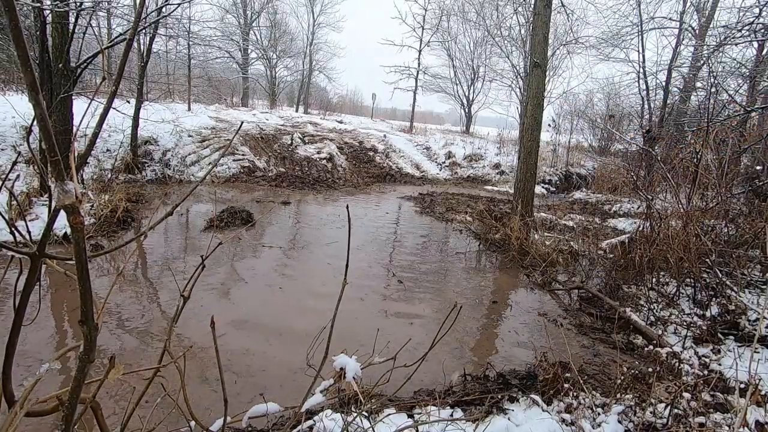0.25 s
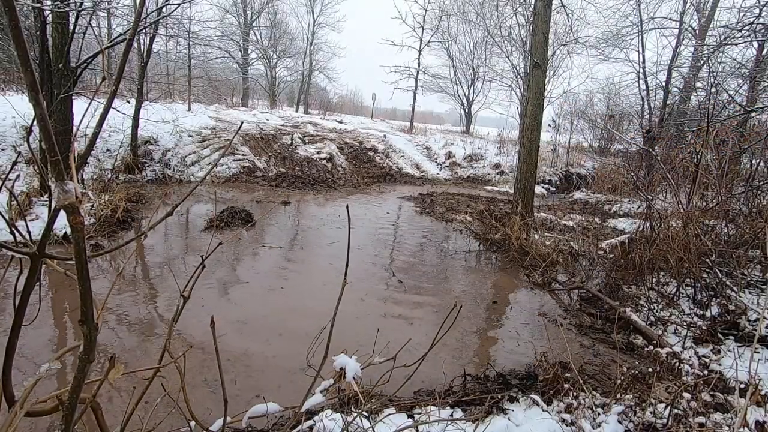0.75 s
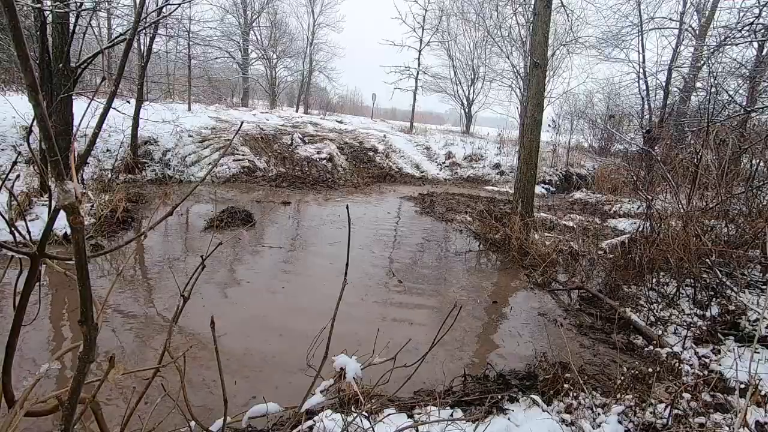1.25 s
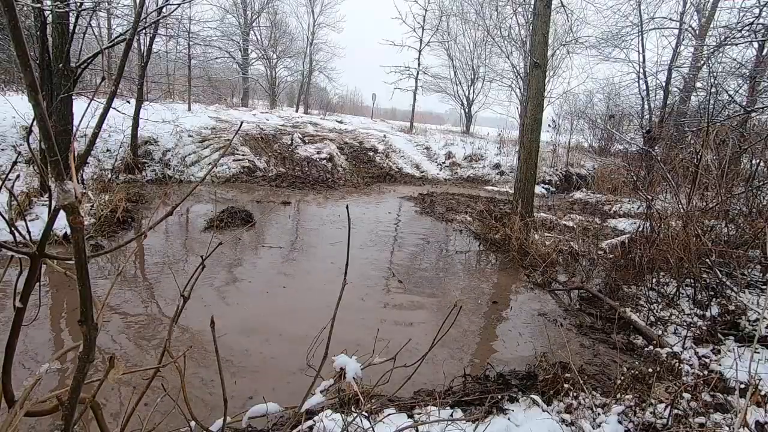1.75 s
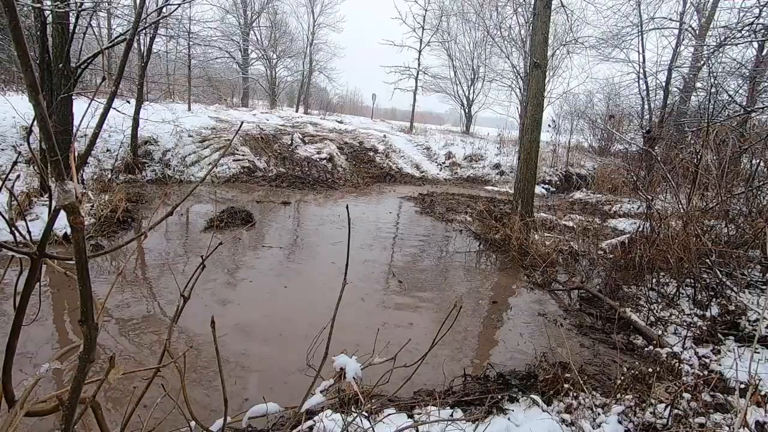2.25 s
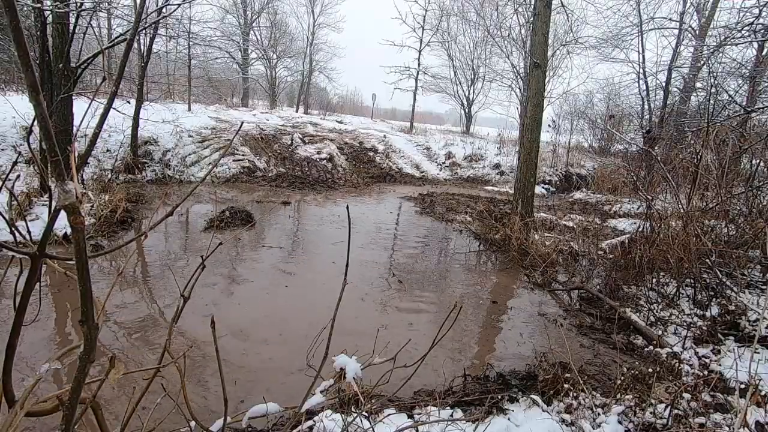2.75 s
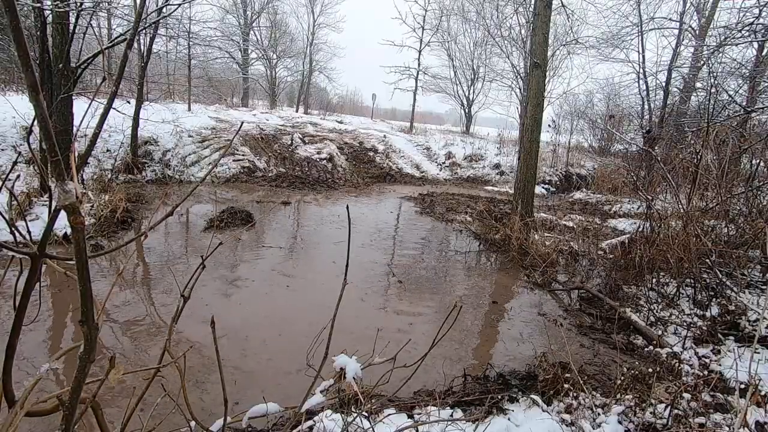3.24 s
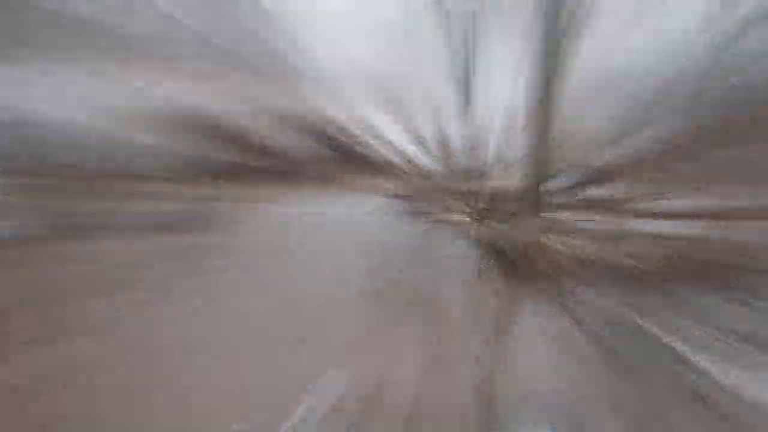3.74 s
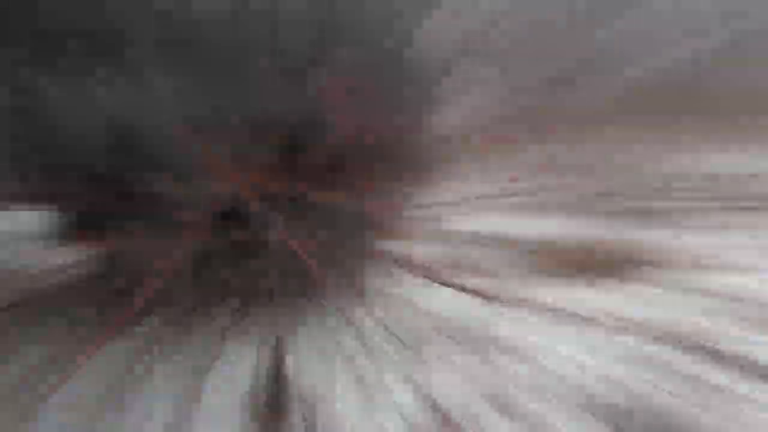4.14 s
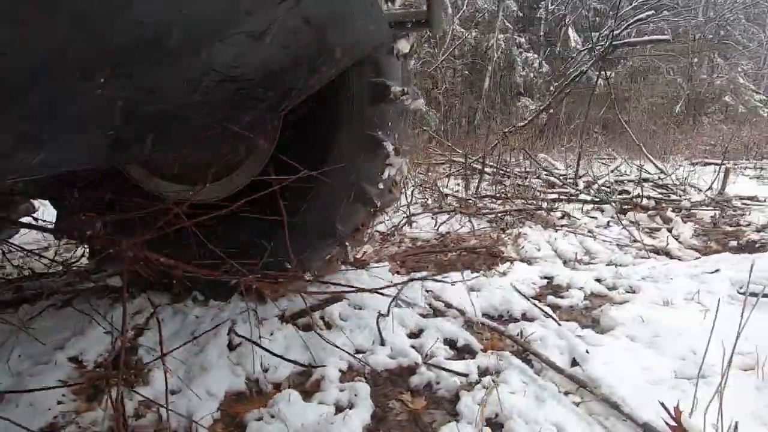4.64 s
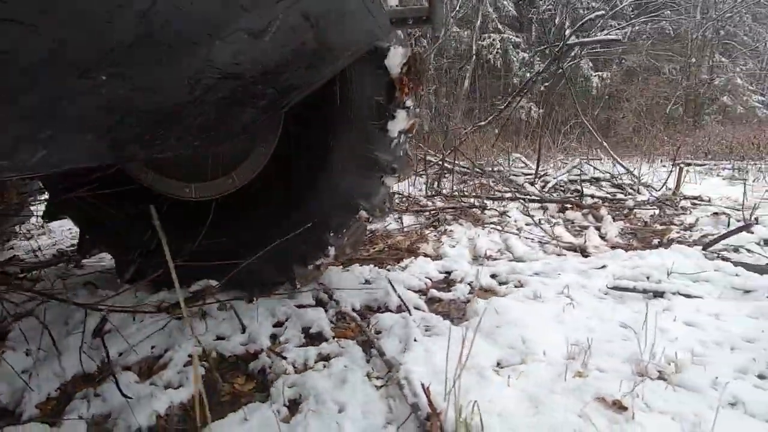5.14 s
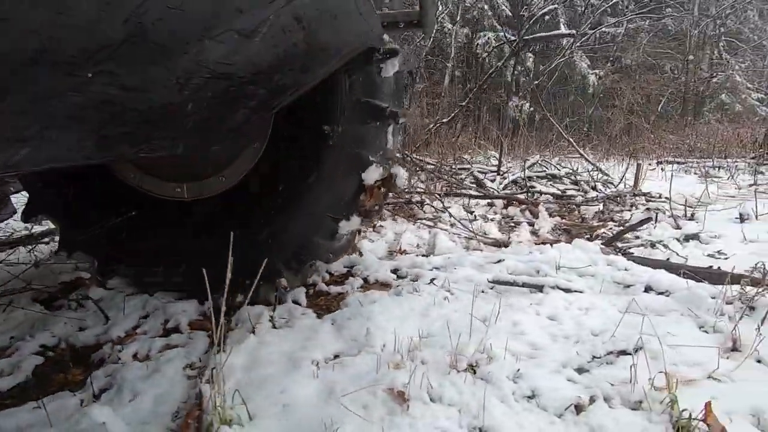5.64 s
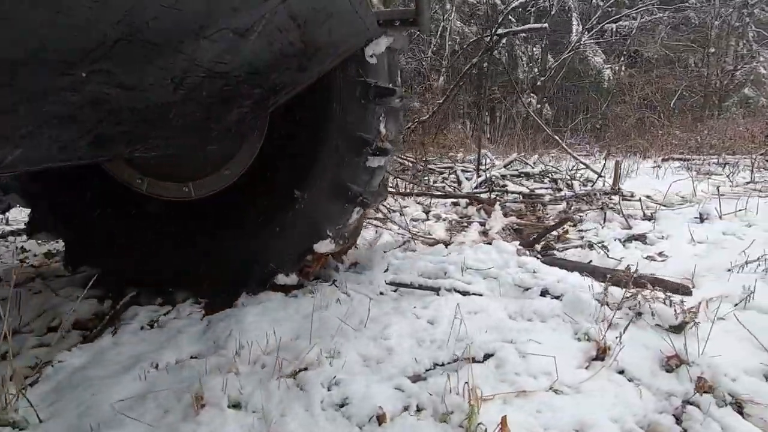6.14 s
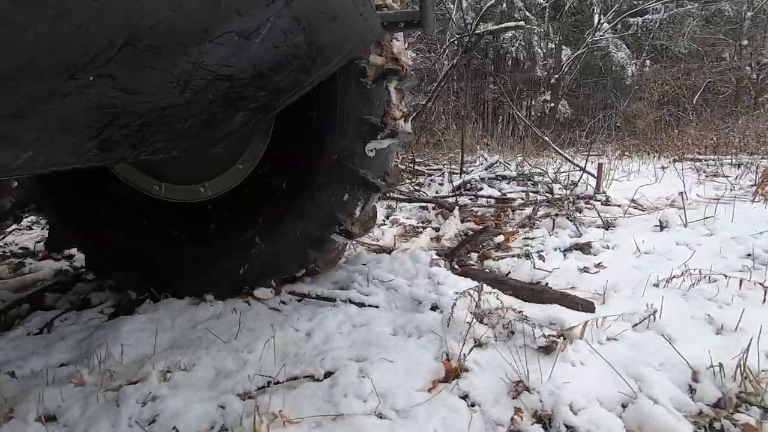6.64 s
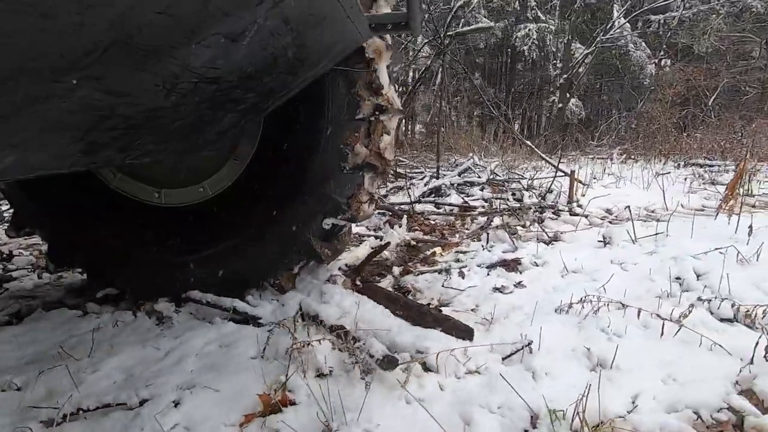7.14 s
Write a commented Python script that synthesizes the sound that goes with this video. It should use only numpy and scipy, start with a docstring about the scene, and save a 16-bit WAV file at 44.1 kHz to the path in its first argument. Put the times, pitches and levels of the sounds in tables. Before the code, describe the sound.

Distant diesel engine hum blends into a close, deep throbbing clatter while branches crackle violently, then sparse snaps and dull knocks over crawling tyres.

```python
"""A diesel all-terrain vehicle drones across a muddy pond in snowy woods while a few drips tick close by.
Its tones follow the firing rate, its rasp and clatter are gated noise; near 2.9 s its hull booms over a bump.
From 3.5 s to 4.565 s this crossfades to a spot beside its wheel: steady harmonics throb, the block clatters.
Around 4 s brushwood scrapes, snaps, squeals and knocks, as noise bursts and slips that ring resonances;
snow sifts off it as filtered grains, then scattered snaps follow and dull knocks return, strongest near 7.2 s."""
import sys
import numpy as np
from scipy import signal
from scipy.fft import rfft, irfft, next_fast_len
from scipy.io import wavfile

SR = 44100
rng = np.random.default_rng(int(sys.argv[2]) if len(sys.argv) > 2 else 0)


def pcm_store(signal):
    """Save signal as 16-bit PCM."""
    levels = np.round(np.clip(np.atleast_2d(signal), -1, 1) * 32767)
    wavfile.write(sys.argv[1], SR, levels.astype(np.int16).T)


N = 325899
TIME = np.arange(N) / SR
SIDES = np.array([[1], [-1]])  # left, right
# crossfade from the far to the near engine
DISSOLVE_START_S, DISSOLVE_END_S = 3.5, 4.565
CRAWL_HZ = 56.5  # firing rate at crawling speed
USUAL_SNAP_S, TWIG_HZ = 0.022, 3580  # reference length and pitch of a snap


def from_db(db):
    """Level to amplitude: 20 dB is a factor of ten."""
    return 10 ** (np.asarray(db) / 20)


def rms_one(x):
    """Normalise the effective value (root mean square) to 1."""
    return x / np.sqrt(np.mean(x ** 2) + 1e-20)


def peak_one(x):
    """Normalise the peak amplitude to 1."""
    return x / np.max(np.abs(x))


def in_time(rows):
    """Linear interpolation in time: one curve per column after the first."""
    s, *columns = np.transpose(rows)
    return [np.interp(TIME, s, c) for c in columns]


def at_hz(points, hz):
    """Linear interpolation of a spectrum over log frequency."""
    f, value = np.transpose(points)
    return np.interp(np.log(hz + 1), np.log(f), value)


def ramp(start, end):
    """Linear transition: from 0 at one time to 1 at another."""
    return np.clip((TIME - start) / (end - start), 1e-9, 1)


def panned(pan_db):
    """Stereo level difference: left and right gains, half of it on each side."""
    return from_db(0.5 * SIDES * pan_db)


def add(out, s, sound):
    """Superposition: mix a short sound in at time s."""
    start = max(0, round(s * SR))
    out[..., start:start + sound.shape[-1]] += sound[..., :N - start]


def drift(rate):
    """Random modulation: noise through two equal poles at rate/Hz, with spread 1."""
    step = 40  # samples between computed points
    r = np.exp(-2 * np.pi * step * rate / SR)
    noise = rng.standard_normal(N // step + 2002)
    slow = signal.lfilter([1], [1, -2 * r, r * r], noise)[2000:]  # drop the settling
    return np.interp(np.arange(N) / step, np.arange(len(slow)), rms_one(slow))


def lowpass(x, hz, order):
    """Low-pass filtering: attenuate what lies above a cutoff."""
    return signal.sosfilt(signal.butter(order, hz, fs=SR, output="sos"), x)


def resonance(x, hz, width):
    """Damped oscillator: a two-pole resonance with gain 1 on top."""
    r = np.exp(-np.pi * width / SR)
    zeros = np.array([1, 0, -1]) * (1 - r * r) / 2
    poles = [1, -2 * r * np.cos(2 * np.pi * hz / SR), r * r]
    return signal.lfilter(zeros, poles, x)


def coloured(x, spectrum):
    """Spectral shaping: weight a signal by a curve that falls away above its last point; rms 1."""
    size = next_fast_len(N)
    hz = np.arange(size // 2 + 1) * SR / size
    gain = from_db(at_hz(spectrum, hz)) / (1 + (hz / spectrum[-1][0]) ** 4)
    return rms_one(irfft(rfft(x, size) * gain, size)[..., :N])


def narrow_noise(hz, width):
    """Narrow-band noise: slow random quadratures on a carrier that may move; rms 1."""
    phase = 2 * np.pi * np.cumsum(hz * np.ones(N)) / SR
    a, b = lowpass(rng.standard_normal((2, N)), width / 2, order=2)
    return rms_one(a * np.cos(phase) + b * np.sin(phase))


def wide_narrow_noise(hz, width):
    """Incoherence: independent narrow-band noise at left and right."""
    return np.array([narrow_noise(hz, width) for side in range(2)])


def burst(t60):
    """Exponential decay: noise that falls 60 dB in t60/s, held in half a second."""
    t = TIME[:SR // 2]
    return rng.standard_normal(len(t)) * (from_db(-60 * t / t60) + 1e-12)


def click_like(x):
    """Impulse excitation: a single click that carries the energy of x."""
    return signal.unit_impulse(x.shape[-1]) * np.sqrt(np.sum(x ** 2, axis=-1, keepdims=True))


def slips(per_s, spread_db):
    """Stick-slip friction: tiny clicks of uneven size, coming in clumps."""
    born = rng.random(N) < per_s * from_db(3 * drift(40)) / SR
    size_db = spread_db * np.minimum(rng.exponential(1, N), 3)
    return born * rng.choice([-1, 1], N) * from_db(size_db) + 1e-18


def drips():
    """Impact noise: a bright tick and a short spray of droplets, shaped by two broad resonances."""
    # drips close by: t/s, peak level/dB, f/Hz, decay time t60/s
    drip_rows = [(.002, -34, 7800, 0.19), (0.146, -28, 5700, 0.3), (0.146, -22, 2400, 0.071),
                 (.265, -38, 6000, 0.2), (0.942, -29.5, 6000, 0.23), (1.77, -43, 6516, 0.16)]
    out = np.zeros((2, N))
    for s, db, hz, t60 in drip_rows:
        splash = np.array([burst(t60) + 1.6 * burst(t60 / 9) for side in range(2)])
        splash = resonance(splash, hz, 0.85 * hz) + 0.29 * resonance(splash, .5 * hz, 0.38 * hz)
        add(out, s, from_db(db) * peak_one(lowpass(splash, 11500, order=4)))
    return out


def sifting_snow():
    """Shot noise: countless grains of snow off the bent brushwood merge into a fine, bright hiss."""
    # hiss of the loose snow: t/s, level/dB
    sift_level = [(4.4, -100), (4.55, -55), (4.8, -53), (5.1, -56), (5.33, -57), (5.55, -71), (5.9, -83)]
    # its relative power density: f/Hz, level/dB
    sift_colour = [(1500, -12), (3600, -11.5), (5000, -10), (6400, 5.5), (7900, 4), (8750, -11.5),
                   (9600, 2), (11200, -7), (15500, -18)]
    grains = rng.standard_normal(N) + 0.5 * rng.standard_normal((2, N))
    grains = grains + 0.4 * rms_one(slips(900, spread_db=3.5))
    level_db, = in_time(sift_level)
    return from_db(level_db) * coloured(grains, sift_colour)


def housing(x):
    """Forced resonance: sharp sounds set the microphone housing ringing."""
    # modes of the housing: f/Hz, width/Hz, level/dB
    housing_modes = [(2520, 130, -18.5), (4200, 250, -23.5), (8570, 250, -1), (13200, 2700, -10.5)]
    ringing = sum(from_db(db) * resonance(x, hz, width) for hz, width, db in housing_modes)
    return lowpass(ringing, 9300, order=3)  # it passes little above this


def brushwood():
    """Friction excitation: slipping twigs ring many resonances, over a fine rustle of the tread in snow."""
    # relative power density of the rubbing: f/Hz, level/dB
    rub_colour = [(700, -6.5), (1400, -9.5), (2200, -10), (3300, -12.5), (4200, -12.5), (5400, -13),
                  (8400, -13.5), (10300, -22), (12000, -28.5), (15500, -29.5)]
    # branches dragging over the tyre: t/s, length/s, level/dB, housing ring level/dB,
    # left minus right/dB (it also sets how far the sides differ)
    scrape_rows = [(3.91, 0.13, -45.5, -62, -4.5), (4.15, 0.14, -43, -66, -6), (4.296, 0.2, -39, -56, -4),
                   (4.411, 0.035, -33.5, -42, -3), (4.486, 0.021, -28.5, -54, 3.5),
                   (4.59, 0.082, -42.5, -63, 1), (7.094, 0.057, -53.5, -82, 2), (7.198, 0.2, -54, -85, 2.5)]
    tread_db, attack_s, release_s = -66, 0.0033, 0.038
    crackle = 0
    for hz in np.geomspace(1500, 11000, 14):
        twig = resonance(slips(170, spread_db=5), hz, .07 * hz)
        crackle = crackle + rms_one(twig) * np.sqrt(hz)
    rub = coloured(rms_one(crackle) + 0.6 * rng.standard_normal(N), rub_colour)
    # twigs off to one side reach the two microphone ports differently
    scatter = 0.31 * coloured(rng.standard_normal(N), rub_colour) * SIDES
    contact = rms_one(slips(500, spread_db=7)) + 0.29 * rng.standard_normal(N)
    touch = panned(pan_db=-6) * rms_one(housing(contact))
    out = from_db(tread_db) * ramp(DISSOLVE_START_S, DISSOLVE_END_S) * rub
    for s, length, db, ring_db, pan_db in scrape_rows:
        fall = np.exp(-np.clip((TIME - s - length) / release_s, 0, 20))
        envelope = ramp(s, s + attack_s) * fall
        scrape = panned(pan_db) * from_db(db) * (rub + pan_db * scatter)
        out = out + envelope * (scrape + from_db(ring_db) * touch)
    return out


def squeal():
    """Stick-slip oscillation: a branch on the microphone housing gives a thin, stuttering squeal."""
    # squeal of the branch: t/s, f/Hz, level/dB
    squeal_track = [(4.27, 8820, -90), (4.29, 8760, -38), (4.36, 8750, -57), (4.39, 8745, -35),
                    (4.42, 8980, -32), (4.46, 8800, -45), (4.5, 8230, -28), (4.53, 8340, -52),
                    (4.56, 8500, -100)]
    hz, db = in_time(squeal_track)
    stutter = rms_one(from_db(8.1 * drift(90)))
    return panned(pan_db=-9) * from_db(db) * stutter * wide_narrow_noise(hz, width=630)


def creaks():
    """Self-sustained oscillation: slipping fibres keep a bent twig ringing at an unsteady pitch."""
    # creaks of bent twigs: t/s, length/s, mean f/Hz, level/dB, left minus right/dB
    creak_rows = [(4.429, .004, 2500, -28, 5), (4.436, 0.0054, 3800, -28, -2),
                  (4.467, 0.0072, 4700, -32, 0), (4.493, .009, 5000, -27, 1), (4.509, .008, 4150, -27, -2),
                  (4.516, .008, 4150, -19, -2)]
    edge_s, pitch_wobble = 0.0025, 0.0203  # wobble as a share of the pitch
    out = np.zeros((2, N))
    unsteady_time = np.cumsum(1 + pitch_wobble * drift(147)) / SR
    for s, length, hz, db, pan_db in creak_rows:
        envelope = ramp(s, s + edge_s) * ramp(s + length + edge_s, s + length)
        out += panned(pan_db) * from_db(db) * envelope * np.sin(2 * np.pi * hz * unsteady_time)
    return out


def small_twigs():
    """Random point process: faint snaps under the tread after the crossfade, as rows for snaps()."""
    per_s, mean_db, spread_db = 4, -40, 6
    rows = []
    for _ in range(round(per_s * (N / SR - DISSOLVE_END_S))):
        s = rng.uniform(DISSOLVE_END_S, N / SR)
        db = mean_db + spread_db * rng.normal()
        hz = TWIG_HZ * 2 ** rng.uniform(-0.53, 0.3)
        rows.append((s, db, hz, 0, 9000, USUAL_SNAP_S, 0))
    return rows


def snaps():
    """Fracture: tearing fibres release a burst that rings the twig and, mostly on the right, the housing."""
    # twigs breaking: t/s, peak level/dB, twig f/Hz, level of its modes/dB, cutoff f/Hz,
    # decay time t60/s, pan setting/dB (positive is left; scaled below)
    snap_rows = [(3.855, -21.5, 4840, -4, 9870, 0.027, -18.5), (3.944, -14.5, 2633, -3, 6400, .019, -4),
                 (3.987, -14.5, 2322, -4, 8000, 0.01, -7), (4.017, -13.5, 2120, -6, 9000, 0.024, -7),
                 (4.083, -6.5, 2500, -1, 8000, 0.0079, -6.5), (4.145, -7, 2800, -7, 8020, 0.04, -5),
                 (4.193, -10.5, 1650, 3, 6500, 0.032, -7.5), (4.268, -5, 2440, -1.5, 6150, 0.046, -2.5),
                 (4.2835, 4.5, 4760, 17, 9000, 0.0077, -4), (4.3065, -10, 4640, 2, 8000, 0.015, -3),
                 (4.3675, -17, 3880, 6, 6000, .018, -2), (4.407, -16, 3537, 3, 6000, 0.016, -1),
                 (4.4281, -5.5, 2980, -11, 7000, 0.024, 4), (4.4436, -6.5, 3740, -3, 7440, 0.058, -4),
                 (4.463, -14, 2410, 2, 6500, 0.055, 0), (4.476, -19, 4400, -3, 7500, .015, 0),
                 (4.4897, -10, 4860, 0, 7430, 0.016, -3), (4.505, -4.5, 4230, -3, 6500, 0.032, 3),
                 (4.509, -10.5, 2600, -4, 7500, .012, 3), (4.518, -5, 4060, 6, 6500, 0.016, 3),
                 (4.522, -12, 4130, 2, 7000, 0.013, 0), (4.5396, -4.5, 3500, -5, 10500, 0.011, 1),
                 (4.606, -13.5, 3410, -2, 11500, 0.049, 2.5), (4.6482, -19.5, 3340, 2, 8500, 0.018, -1),
                 (4.859, -26.5, 3003, 7, 8400, 0.036, 0.5), (4.987, -24.5, 3633, -5, 10000, 0.021, 2),
                 (5.0675, -29, 3630, -11, 9500, 0.023, -1), (5.371, -26.5, 1370, 18, 2670, 0.16, 1),
                 (6.079, -41.5, 5000, -2, 10950, 0.029, 0), (6.1969, -28, 4300, 6, 9950, 0.037, 1),
                 (6.2136, -22.5, 2011, 1, 7970, 0.045, 0), (6.505, -23.5, 1415, 18, 2218, 0.026, -1),
                 (6.863, -33, 3800, 5, 7380, 0.026, 0), (6.968, -31, 2404, -6, 4572, .02, 1),
                 (7.135, -32, 3892, 8, 8000, .054, 1), (7.153, -28.5, 3170, 10, 4990, 0.043, -1),
                 (7.22, -16.5, 1420, 7, 3660, 0.034, -2.5), (7.298, -20, 2800, -1, 4660, 0.033, 0),
                 (7.302, -22, 1700, -3, 4990, 0.036, -1), (7.316, -27, 3000, -4, 10000, 0.023, 1),
                 (7.333, -31, 2760, 8, 4500, .025, 0)]
    # bending modes of a twig: multiple of its pitch, level/dB
    bending_modes = [(1, 6), (1.56, -9.5), (2.02, -6), (3.1, -7.5)]
    crack_db, crack_share = 3.5, 0.09  # opening crack: level over the tearing, share of its decay time
    out = np.zeros((2, N))
    for s, db, hz, tone_db, top_hz, t60, pan_db in snap_rows + small_twigs():
        tear = burst(t60) + from_db(crack_db) * burst(crack_share * t60)
        tear = tear + 0.11 * pan_db * burst(t60) * SIDES
        release = 0.75 * click_like(tear) + 0.5 * tear
        modes = sum(from_db(mode_db) * resonance(release, k * hz, 0.073 * hz) for k, mode_db in bending_modes)
        wood = from_db(tone_db) * modes + 0.5 * resonance(tear, hz, hz)
        wood = lowpass(wood, top_hz, order=3)
        # short snaps of thin, high-pitched twigs ring the housing hardest: dB per halving, dB per octave
        ring_db = -20 + 16.5 * np.log2(USUAL_SNAP_S / t60) + 8 * np.log2(hz / TWIG_HZ)
        ports = np.array([rms_one(housing(burst(t60))), rms_one(housing(release[1]))])
        ringing = from_db(ring_db) * panned(pan_db=-6) * ports
        add(out, s, from_db(db) * peak_one(panned(0.71 * pan_db) * rms_one(wood) + ringing))
    return out


def knocks():
    """Impact of heavy bodies: wood, tyre and hull meet in one push, then a short rumble."""
    # dull knocks: t/s, peak level before panning/dB, f/Hz, rumble decay time t60/s, left minus right/dB
    knock_rows = [(3.946, -18.5, 270, 0.049, -1.5), (4.146, -11.5, 148, 0.089, -1.5),
                  (4.145, -14, 880, 0.036, -6), (4.269, -28, 321, 0.03, -9), (4.539, -12, 198, 0.048, -1.5),
                  (5.5097, -19.5, 716, 0.015, -2), (6.0865, -21, 718.7, 0.015, 1.5),
                  (6.505, -24, 620, .05, 2), (6.969, -24, 794, 0.015, 0), (7.2194, -6.5, 225, 0.063, 0.5),
                  (7.217, -18, 560, 0.018, 3), (7.298, -16, 278, 0.05, -3), (7.3035, -18, 690, 0.034, 0.5)]
    out = np.zeros((2, N))
    for s, db, hz, t60, pan_db in knock_rows:
        rumble = burst(t60)
        contact = click_like(rumble) + from_db(-7.5) * rumble
        thud = resonance(resonance(contact, hz, 0.53 * hz), hz, 1.4 * hz)
        add(out, s, panned(pan_db) * from_db(db) * peak_one(thud))
    return out


def bump():
    """Modal excitation: a jolt over a bump makes the far hull boom, swell and die away."""
    # modes of the hull: f/Hz, width/Hz, level/dB
    hull_modes = [(155, 31, -24.5), (490, 72, -36.5), (762, 220, -37), (1200, 390, -44.5)]
    start_s, top_s, decay_s = 2.91, 2.945, 0.04
    envelope = ramp(start_s, top_s) * np.exp(-np.clip((TIME - top_s) / decay_s, 0, 20))
    return envelope * sum(from_db(db) * narrow_noise(hz, width) for hz, width, db in hull_modes)


def among_trees(pair):
    """Interaural coherence: two unrelated signals become left and right, most alike in the bass."""
    # left-right likeness across the pond: f/Hz, coherence (0 to 1)
    likeness = [(60, 0.92), (260, 1), (530, 0.78), (1110, 0.076), (2290, 0.55), (4750, 0.041),
                (9840, 0.052)]
    # direction across the pond: f/Hz, left minus right/dB
    direction = [(60, -1), (330, 0), (580, -2.5), (1020, -10), (1800, -7.5), (3170, -8), (5580, -1.5),
                 (9840, 1.5)]
    size = next_fast_len(N)
    hz = np.arange(size // 2 + 1) * SR / size
    mid, side = rfft(pair, size)
    alike = np.clip(at_hz(likeness, hz), 0, 1)
    both = np.sqrt((1 + alike) / 2) * mid + SIDES * np.sqrt((1 - alike) / 2) * side
    return irfft(both * panned(at_hz(direction, hz)), size)[:, :N]


def exhaust_tones(turns, orders, waver_db, sway):
    """Harmonic synthesis: phase-offset tones form a steep-fronted pulse; each wavers by itself."""
    tones = 0
    for k, db in orders:
        level = from_db(db + waver_db * drift(2.6))
        phase = 2 * np.pi * k * turns + 1.091 * (k - 1) + sway * np.sqrt(k) * drift(6.3)
        tones = tones + level * np.cos(phase)
    return tones


def firing_gate(turns, lag, depth_db, uneven_db):
    """Amplitude modulation: a swell of uneven strength, a share of a turn (lag) after each firing."""
    turns = turns - lag
    strength = np.clip(rng.standard_normal(1000), -2, 1.4)[np.floor(turns).astype(int) % 1000]
    swell = np.sin(np.pi * (turns % 1) ** 0.44) ** 2
    return rms_one(from_db(swell * (depth_db + uneven_db * strength)))


def rattle(turns):
    """Periodic impacts: a knock of uneven strength at each firing, half buried in its echoes."""
    uneven_db, decay_turns, knock_share = 2, .7, .3
    strength_db = uneven_db * np.clip(rng.standard_normal(1000), -2, 2)[turns.astype(int) % 1000]
    knock = rms_one(from_db(strength_db) * np.exp(-(turns % 1) / decay_turns))
    return rms_one(1 - knock_share + knock_share * knock)


def far_clatter(turns):
    """Structure-borne sound: the block shakes hull panels, whose resonances wander and swell."""
    # relative power density of the block: f/Hz, level/dB
    block_colour = [(590, -21), (1000, -8.5), (1300, -4), (1750, -4), (2450, -10.5), (3010, -8.5),
                    (3700, -13), (7000, -21), (8500, -24.5), (10300, -28.5), (12000, -38), (15500, -43)]
    # hull panels: mean f/Hz, width/Hz, first level over the clatter/dB, rate of change/(dB/s)
    panel_rows = [(763, 88, -15, 3.5), (948, 83, -5.5, -1.5), (1750, 120, -12.5, -1.2),
                  (2950, 570, -16.5, 1.5)]
    # level of the far clatter: t/s, level/dB
    clatter_level = [(0, -45), (1, -45), (1.4, -46), (1.75, -45.5), (2.2, -46), (2.6, -47.5), (2.95, -45.5),
                     (3.65, -45)]
    wander_octaves, swell_db = .03, 1.0
    knocking = rattle(turns)
    out = coloured(rng.standard_normal((2, N)) * knocking, block_colour)
    for hz, width, db, db_per_s in panel_rows:
        centre = hz * 2 ** (wander_octaves * drift(1))
        trend_db = db + db_per_s * np.minimum(TIME, DISSOLVE_START_S)
        level = from_db(trend_db + swell_db * drift(3.3))
        out = out + level * knocking * wide_narrow_noise(centre, width)
    level_db, = in_time(clatter_level)
    return from_db(level_db) * out


def far_engine():
    """Multipath propagation: the drone wavers, and echoes from the trees smear the single firings."""
    # engine speed: t/s, mean firing rate f/Hz
    speed = [(0, 60.35), (.6, 59.78), (1.2, 60.33), (1.5, 58), (1.95, 59.9), (2.35, 58.6), (2.75, 60),
             (2.95, 60.64), (3.65, 61.44)]
    # fundamental across the pond: t/s, level/dB
    throb_level = [(0, -25), (.6, -23.5), (1.2, -27.5), (1.4, -23), (2.1, -25.5), (2.4, -23), (3.25, -23),
                   (3.7, -27)]
    # overtones: t/s, level of all but the third/dB, level of the third/dB
    overtone_levels = [(0, -27, -33.5), (.55, -26.5, -31.5), (.9, -25, -31.5), (1.4, -26.5, -36.5),
                       (1.62, -27.5, -37), (1.75, -28.5, -33), (2.15, -29, -36), (2.4, -26.5, -35.5),
                       (2.75, -29, -37.5), (3.15, -32.5, -36), (3.6, -30.5, -48)]
    # tones of exhaust and belt-driven parts: multiple of the firing rate, relative level/dB
    orders = [(1.5, -28.5), (2, 0.5), (3.4, -20), (4.5, -25), (4.85, -18.5), (5.5, -27), (7, -25),
              (9, -30.5), (9.67, -19.5)]
    # relative power density of the rasp: f/Hz, level/dB
    rasp_colour = [(15, -7.5), (28, -3.5), (45, 9.5), (90, 11.5), (140, 7), (200, 8), (240, -2.5),
                   (360, -6.5), (430, -2.5), (560, -3), (700, -5.5), (950, -11), (1300, -15), (2200, -31.5)]
    # silencer resonance, moving as the vehicle turns: t/s, centre f/Hz, level/dB
    silencer = [(0, 581, -44), (.9, 566, -43.5), (1.3, 518.5, -40.5), (1.7, 551.5, -42.5),
                (2.3, 564.4, -47.5), (2.82, 568.6, -48.5), (2.95, 500, -50), (3.3, 501, -49),
                (3.7, 514.2, -59.5)]
    hz, = in_time(speed)
    turns = np.cumsum(hz * (1 + 0.003 * drift(14.3))) / SR
    # echoes put left and right slightly out of step, in turns
    heard_turns = turns + 0.0073 * drift(9) * SIDES
    throb_db, = in_time(throb_level)
    drone = from_db(throb_db) * np.cos(2 * np.pi * heard_turns)
    overtones_db, third_db = in_time(overtone_levels)
    drone += from_db(overtones_db) * exhaust_tones(heard_turns, orders, waver_db=1.9, sway=0.3)
    drone += from_db(third_db) * exhaust_tones(heard_turns, [(3, 0.0014)], waver_db=1.4, sway=0.11)
    puffs = rng.standard_normal((2, N)) * firing_gate(turns, lag=0.34, depth_db=1.5, uneven_db=-0.5)
    rasp_db = -31.5 - 1.08 * TIME  # fades at a steady rate, dB per s
    rasp = from_db(rasp_db) * coloured(puffs, rasp_colour)
    ring_hz, ring_db = in_time(silencer)
    rasp += from_db(ring_db) * wide_narrow_noise(ring_hz, width=92)
    return drone + among_trees(rasp + far_clatter(turns))


def valve_train(turns):
    """Cyclic excitation: small contacts as noise, part of which repeats every two firings."""
    repeat_share = .3  # share of the power
    cycle = rng.standard_normal(round(2 * SR / CRAWL_HZ))
    repeating = cycle[(turns / 2 % 1 * len(cycle)).astype(int)]
    return np.sqrt(repeat_share) * repeating + np.sqrt(1 - repeat_share) * rng.standard_normal(N)


def near_engine():
    """Direct sound: firm harmonics, a puff of rasp and a tick of the injectors at each firing."""
    # drive: t/s, mean firing rate f/Hz, level of the exhaust overtones/dB
    drive = [(3.75, 50.21, -18.5), (4.33, 52.33, -21.5), (4.45, 54.38, -22.5), (4.75, 55.14, -21.5),
             (5.15, 55.25, -23.5), (6.0, 55.76, -22.5), (6.65, 56.6, -19.5), (7.05, 58.13, -22.5),
             (7.39, 57.6, -22.5)]
    # second harmonic of the exhaust: t/s, level/dB
    second_level = [(3.8, -21), (4.6, -25), (5.4, -27), (5.95, -23.5), (6.1, -22), (6.8, -23.5),
                    (7.15, -23.5), (7.39, -24)]
    # tones of exhaust and belt-driven parts: multiple of the firing rate, relative level/dB
    orders = [(.5, -19), (1.59, -16.5), (1.9, -11.5), (2.5, -21.5), (3, 1), (3.5, -18.5), (4.002, -22),
              (4.499, -23.5), (4.85, -14), (5, -9)]
    # tones that follow the rasp: multiple of the firing rate, level over the rasp/dB
    rasp_orders = [(6, -22.5), (7, -20.5), (10, -15), (11, -16), (11.5, -16.5), (15, -19.5), (23, -31.5),
                   (26.5, -31)]
    # relative power density of the rasp: f/Hz, level/dB
    rasp_colour = [(18, -6.5), (30, -1), (45, 1.5), (90, 5.5), (140, 7), (210, 1.5), (320, 0.5),
                   (420, -4.5), (520, -6.5), (630, -7), (690, -13), (850, -13), (1100, -24), (2000, -49.5)]
    # relative power density of the clatter: f/Hz, level/dB
    clatter_colour = [(530, -23.5), (900, -5), (1100, -1.5), (1450, -3.5), (1750, -5.5), (2150, -6.5),
                      (3200, -11.5), (3750, -10.5), (4750, -17), (5500, -33), (8000, -28.5), (10300, -39.5),
                      (12500, -34.5), (15500, -42.5)]
    # ringing modes of the engine cover: f/Hz, width/Hz, level over the plain clatter/dB
    cover_modes = [(750, 40, -0.5), (1086, 75, -3.5), (1334, 24, 4), (1466, 46, -1), (1970, 44, -5),
                   (2230, 40, -5.5), (4640, 50, 0)]
    hz, overtones_db = in_time(drive)
    # as the firing rate rises the rasp weakens and the clatter grows, dB per Hz
    rasp_db = -27 - 0.23 * (hz - CRAWL_HZ)
    clatter_db = -43 + .5 * (hz - CRAWL_HZ)
    turns = np.cumsum(hz * (1 + 0.003 * drift(14.4))) / SR
    throb = from_db(-12) * np.cos(2 * np.pi * turns)
    throb += from_db(overtones_db) * exhaust_tones(turns, orders, waver_db=0.66, sway=0.087)
    second_db, = in_time(second_level)
    throb += from_db(second_db) * exhaust_tones(turns, [(2, 0)], waver_db=0.7, sway=0.087)
    puffs = rng.standard_normal(N) * firing_gate(turns, lag=0.25, depth_db=2, uneven_db=1.3)
    rasp = coloured(puffs, rasp_colour)
    rasp += exhaust_tones(turns, rasp_orders, waver_db=1.8, sway=0.18)
    injectors = 1 + 0.82 * np.exp(-((turns - .8) % 1) / 0.085)
    contacts = valve_train(turns) * injectors
    contacts = contacts * firing_gate(turns, lag=0.54, depth_db=0.1, uneven_db=1.3)
    clatter = coloured(contacts, clatter_colour)
    cover = sum(from_db(db) * resonance(clatter, mode_hz, width) for mode_hz, width, db in cover_modes)
    clatter = rms_one(clatter + cover)
    whirr = from_db(-61) * narrow_noise(3760, width=300)  # the drive beside the wheel
    return throb + from_db(rasp_db) * rasp + from_db(clatter_db) * clatter + whirr


def scene():
    """Superposition: the crossfaded far and near engines and the small sounds around them."""
    far = ramp(DISSOLVE_END_S, DISSOLVE_START_S) ** 0.24 * far_engine()
    near = ramp(DISSOLVE_START_S, DISSOLVE_END_S) ** 1.49 * near_engine()
    vehicle = far + bump() + near
    brush = brushwood() + squeal() + knocks() + creaks() + snaps()
    return vehicle + brush + drips() + sifting_snow()


def gain_control(x):
    """Dynamic compression: sharp peaks soon pull the gain down, the bass least; it recovers steadily."""
    split_hz, bass_share = 230, 0.12  # the bass takes this share of the reduction in dB
    threshold_db, attack_s, release_db_per_s = -9.5, 0.011, 25
    bass = signal.sosfiltfilt(signal.butter(2, split_hz, fs=SR, output="sos"), x)
    peak_db = 20 * np.log10(np.abs(x - bass).max(axis=0) + 1e-9)
    over_db = np.maximum(peak_db - threshold_db, 0)
    # hold each excess and let it sink at the release rate
    recovery = release_db_per_s * TIME
    held_db = np.maximum.accumulate(over_db + recovery) - recovery
    r = np.exp(-1 / (attack_s * SR))
    duck_db = signal.lfilter([1 - r], [1, -r], held_db)
    return bass * from_db(-bass_share * duck_db) + (x - bass) * from_db(-duck_db)


def record(dry):
    """Saturation and band limiting: gain control, clipping of overloads, then a steep cut of the top."""
    overload_peak, cutoff_hz = .82, 15800
    held = np.clip(gain_control(dry), -overload_peak, overload_peak)
    return signal.sosfilt(signal.ellip(10, .1, 80, cutoff_hz, fs=SR, output="sos"), held)


dry = scene()
out = record(dry)
pcm_store(out)
```